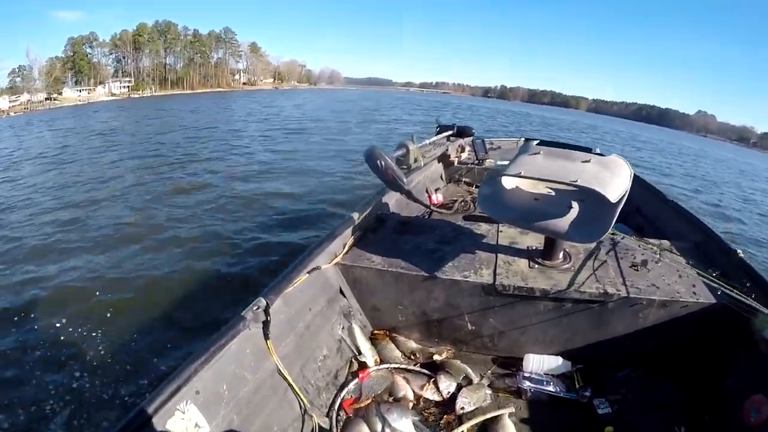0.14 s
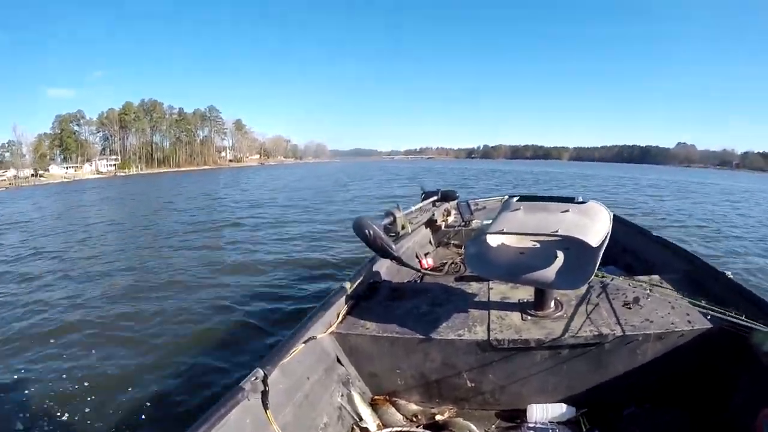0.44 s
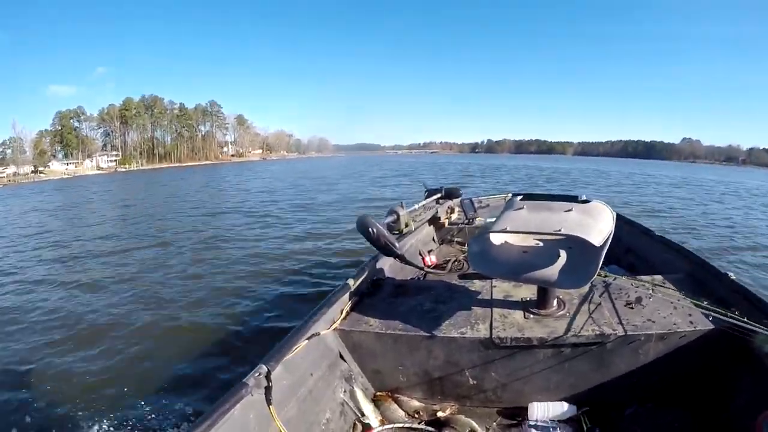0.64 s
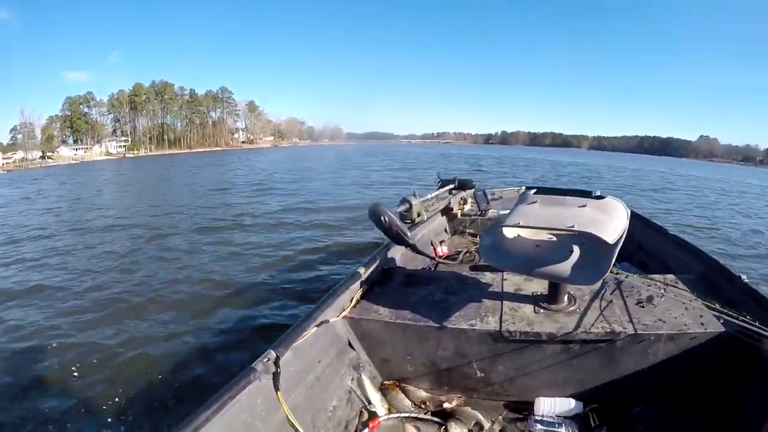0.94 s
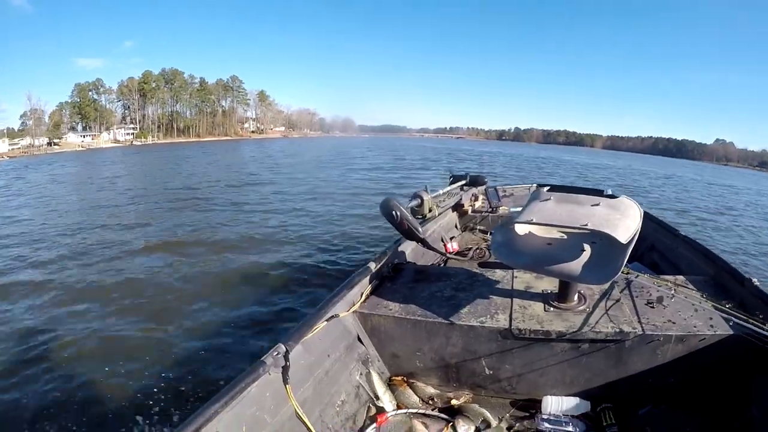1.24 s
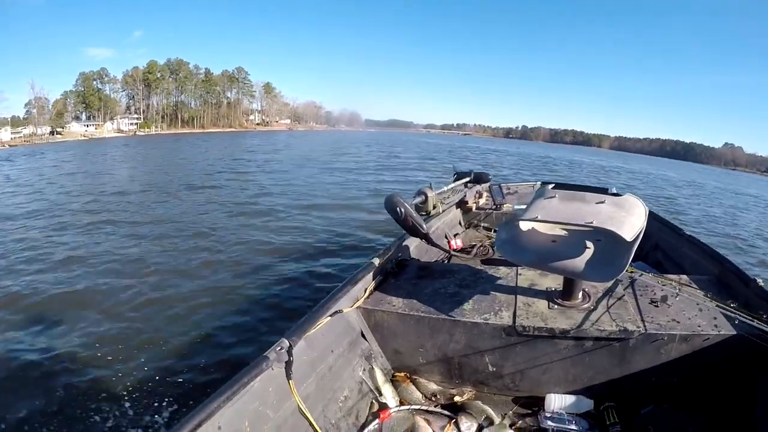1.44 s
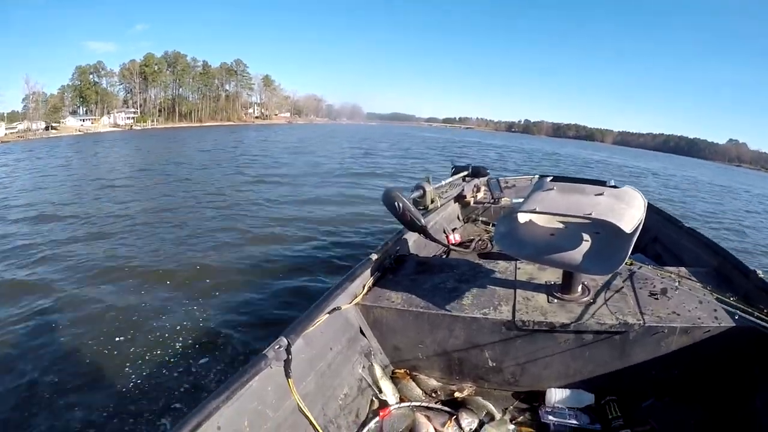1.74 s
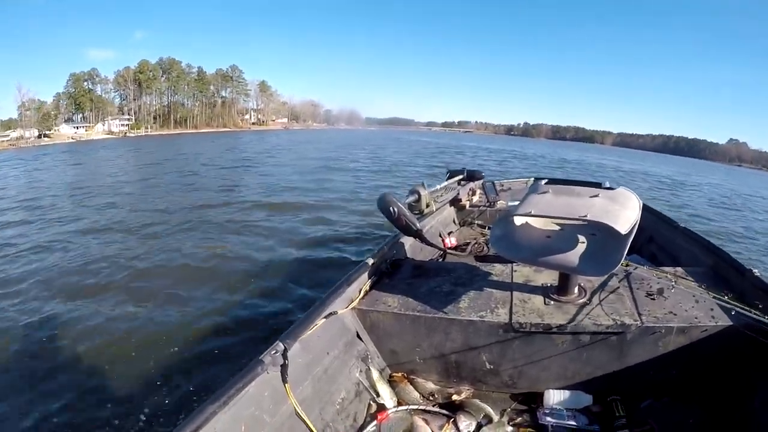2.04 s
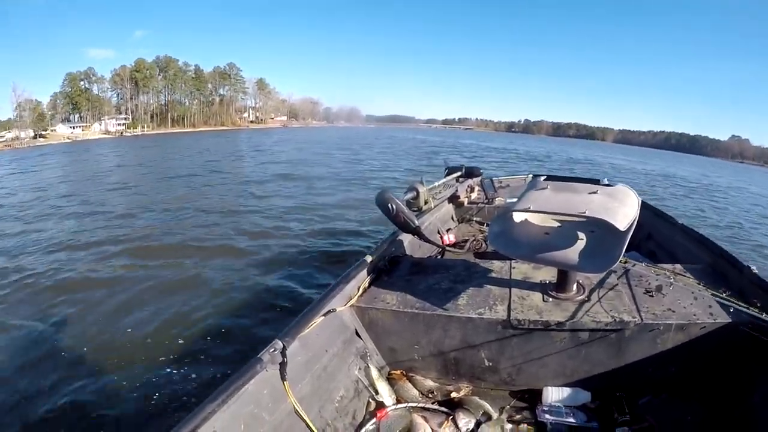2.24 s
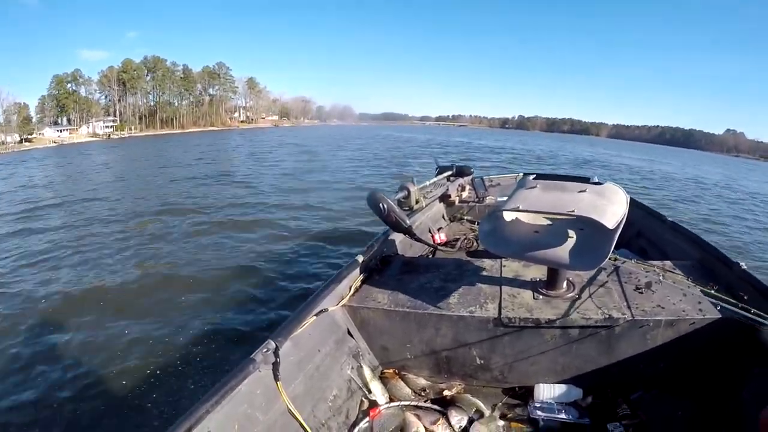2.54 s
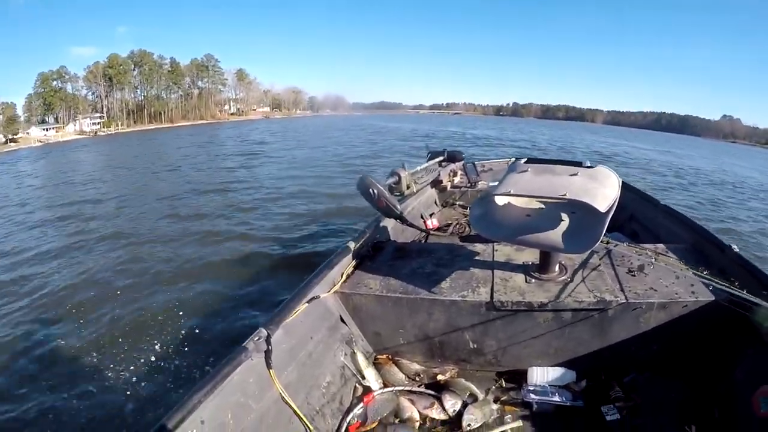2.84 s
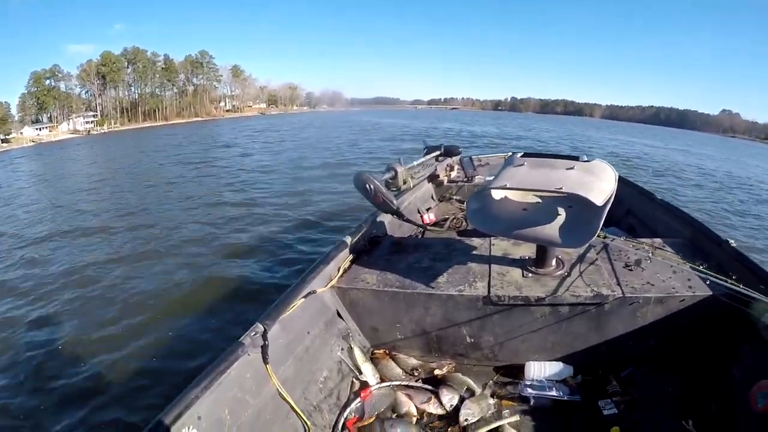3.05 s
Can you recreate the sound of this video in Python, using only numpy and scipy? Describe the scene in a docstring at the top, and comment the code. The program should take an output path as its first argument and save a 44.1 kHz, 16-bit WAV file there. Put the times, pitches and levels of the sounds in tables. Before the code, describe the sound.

A small metal boat's outboard motor hums loudly at speed on open water, slowly gaining revs, while wind rumbles, water rushes past and small slaps knock the hull; close, muffled onboard microphone in a housing.

```python
"""An outboard motor already runs at speed on a small metal boat, muffled as inside a camera housing.
Its shaft orders, harmonics of the rotation, hum through the hull and rise in pitch overall as it gains revs.
Bands of shaped noise give wind rumble, rushing water and thin spray throughout; short chirps give fine droplets.
Three small slaps, gliding tones within noise bursts, come at once; two follow near 1 s.
From about 1.7 s to 2.9 s more slaps come, while the motor keeps running to the end."""
import sys
import numpy as np
from scipy import signal
from scipy.io import wavfile
from scipy.ndimage import uniform_filter1d, minimum_filter1d

SR = 44100
rng = np.random.default_rng(int(sys.argv[2]) if len(sys.argv) > 2 else 0)


def file_out(sig):
    """Save sig as 16-bit WAV at sys.argv[1]."""
    # one column per channel
    cols = np.atleast_2d(sig).T
    # limit, then scale
    lim = np.clip(cols, -1, 1)
    pcm = np.round(lim * 32767).astype(np.int16)
    wavfile.write(sys.argv[1], SR, pcm)


def invert_db(level):
    """Linear amplitude ratio for a level in decibels (20 dB per decade), elementwise."""
    return 10 ** (np.asarray(level, dtype=float) / 20)


N = 141120  # samples

# Course of the motor and its strong shaft orders, rms levels:
# (t/s, shaft speed/(turns/s), 4th order level/dB, 2nd order level/dB, 1st order level/dB)
MOTOR_COURSE = [(0, 76.7, -13.5, -16.5, -39.5), (.3, 78.0, -11, -11.5, -19.5), (.7, 78.6, -11, -13.5, -26),
                (1.1, 79, -10.5, -12, -30.5), (1.6, 80.6, -10, -11.5, -30), (1.8, 80.5, -10, -15.5, -18.5),
                (2.2, 81.1, -10, -14, -29), (2.55, 81.6, -11, -16, -18), (2.9, 82.4, -11.5, -17.5, -22.5),
                (3.2, 82.6, -11, -18, -25)]


def evened(x):
    """Normalization: scales a signal to rms 1."""
    return x / np.sqrt(np.mean(x ** 2) + 1e-20)


def curve(table, column):
    """Linear interpolation: joins a table column by straight lines in time."""
    rows = np.array(table)
    return np.interp(np.arange(N) / SR, rows[:, 0], rows[:, column])


def drift(top_hz):
    """Superposition: sines of random phase, weaker towards top_hz, sum to a wander of rms 1."""
    t = np.arange(0, N + 64, 64) / SR
    wander = 0
    for hz in top_hz * np.geomspace(0.04, 1, 24):
        wander = wander + np.sin(2 * np.pi * (hz * t + rng.random())) / np.sqrt(hz)
    return np.interp(np.arange(N) / SR, t, evened(wander))


def hiss(spectrum, size, patchy_db, flicker_db):
    """Short-time synthesis: shaped random spectra, with drifting patches and a flicker common to all bands."""
    frames = 4 * N // size + 8
    hz = np.fft.rfftfreq(size, 1 / SR)
    real, imag, patches = rng.standard_normal((frames, len(hz), 3)).T
    # The arrays run (frequency, frame): smooth the patches along both.
    patches = evened(uniform_filter1d(uniform_filter1d(patches, 8, 0), 6, 1))
    flicker = evened(uniform_filter1d(rng.standard_normal(frames), 3))
    f, db = np.transpose(spectrum)
    level = np.interp(np.log(hz + 1), np.log(f + 1), db, left=-90, right=-90)[:, None]
    z = (real + 1j * imag) * invert_db(level + patchy_db * patches + flicker_db * flicker)
    noise = signal.istft(z, nperseg=size, noverlap=3 * size // 4)[1]
    return evened(noise[:N])


def shaft_angle():
    """Rotation: the angle/rad is the running sum of a slightly unsteady shaft speed."""
    jitter, jitter_top_hz = 0.0015, 20  # jitter: rms share of the speed
    speed = curve(MOTOR_COURSE, 1) * (1 + jitter * drift(jitter_top_hz))
    return 2 * np.pi * np.cumsum(speed) / SR


def motor(angle):
    """Harmonic synthesis: suction-like pulses from three strong orders in step and many weak, wavering ones.
    Uneven firing moves energy from the 2nd order to the 1st."""
    # Weaker shaft orders: (multiple of shaft speed, rms level/dB before wavering)
    weak_orders = [(3, -33), (5, -37.5), (6, -48), (7, -50), (8, -52), (9, -47), (10, -52.5), (11, -54),
                   (12, -60), (13, -59), (14, -56), (15, -61), (16, -57.5), (18, -53), (19, -69.5),
                   (20, -56.5), (21, -59.5), (22, -55), (23, -58.5), (24, -54.5), (25, -56.5), (27, -62.5),
                   (28, -64), (29, -55), (30, -65), (31, -67.5), (32, -62.5), (33, -63)]
    waver_top_hz = 40
    uneven = drift(waver_top_hz)
    strong_orders = [  # (multiple of shaft speed, table column, waver/dB)
        (4, 2, 0.4 * drift(waver_top_hz)),
        (2, 3, -1.3 * uneven),
        (1, 4, 2.8 * uneven)]
    hum = np.zeros(N)
    for order, column, waver_db in strong_orders:
        hum -= invert_db(curve(MOTOR_COURSE, column) + waver_db) * np.cos(order * angle)
    for order, db in weak_orders:
        phase = 2 * np.pi * rng.random()
        hum += invert_db(db + 3.0 * drift(waver_top_hz)) * np.cos(round(order) * angle + phase)
    return np.sqrt(2) * hum  # turns rms levels into cosine peaks


def wind():
    """Turbulence: low-frequency noise of wind on the housing swells with the gusts."""
    # Noise shape: (f/Hz, relative density level/dB per Hz)
    spectrum = [(12, -43.5), (22, -16), (35, -15.5), (65, -3.5), (125, 0.5), (190, -5), (290, -10),
                (400, -15), (450, -27.5), (600, -50)]
    # Gusts: (t/s, rms level/dB)
    gusts = [(0, -13.5), (.3, -18.5), (.6, -17.5), (1.0, -16.5), (1.6, -18), (1.75, -14.5), (2.3, -17),
             (2.45, -14), (2.75, -15.5), (3.2, -15)]
    return invert_db(curve(gusts, 1)) * hiss(spectrum, size=1024, patchy_db=1.1, flicker_db=0.8)


def slap(t, shift, splash_db, top_hz):
    """Damped oscillation: a short wet knock glides up in pitch inside a band-limited splash."""
    from_hz, to_hz, glide_s = 850, 1736, 0.0031  # pitches before the shift
    rise_s, t60_s, splash_low_hz = 0.0017, 0.02, 786
    hz = shift * (to_hz + (from_hz - to_hz) * np.exp(-t / glide_s))
    knock = np.sin(2 * np.pi * np.cumsum(hz) / SR)
    band = signal.butter(3, [splash_low_hz, top_hz], "bandpass", fs=SR, output="sos")
    splash = evened(signal.sosfilt(band, rng.standard_normal(len(t))))
    rise = 1 - np.exp(-(t / rise_s) ** 2)
    decay = invert_db(-60 * np.maximum(t - glide_s, 0) / t60_s)
    return (knock + invert_db(splash_db) * splash) * rise * decay


def slaps():
    """Impact sound: water slaps the hull, each knock a little different in pitch."""
    # Slaps: (t/s, knock amplitude level/dB, splash rms level re knock amplitude/dB, splash top f/Hz)
    hits = [(0.057, -32, -9, 2210), (0.162, -25.5, -9, 4330), (.2795, -28, -9.5, 2200),
            (.966, -27.5, -6, 2300), (1.111, -27.5, -5.5, 2450), (1.6586, -31.5, -11, 2000),
            (1.744, -27.5, -8, 2000), (2.0007, -28, -9, 2300), (2.517, -34, -9, 2000),
            (2.607, -28.5, -9, 2190), (2.715, -24.5, -11, 2300), (2.8142, -26, -11, 2308),
            (2.9235, -26.5, -7, 2009)]
    t = np.arange(3000) / SR
    out = np.zeros(N + len(t))
    for s, db, splash_db, top_hz in hits:
        shift = 1 + 0.03 * rng.standard_normal()
        start = round(s * SR)
        out[start:start + len(t)] += invert_db(db) * slap(t, shift, splash_db, top_hz)
    return out[:N]


def rush(angle):
    """Amplitude modulation: three noise bands of water along the hull and engine rasp pulse twice a turn."""
    # Layer levels: (t/s, wash rms level/dB, gurgle rms level/dB, fizz rms level/dB)
    levels = [(0, -39, -45.5, -43.5), (.1, -37, -44, -47), (.3, -37, -43.5, -49), (.55, -37, -43.5, -50),
              (.75, -38.5, -46, -48.5), (1.0, -40, -44.5, -48.5), (1.3, -40, -43, -49),
              (1.6, -41.5, -45, -49.5), (1.9, -42.5, -44, -50), (2.2, -39.5, -42.5, -50),
              (2.6, -41, -41, -49), (2.9, -40.5, -42, -50), (3.2, -39, -41, -50.5)]
    # Noise shapes, low to high layer: each (f/Hz, relative density level/dB per Hz)
    wash_spectrum = [(300, -17), (480, -5.5), (630, 1), (720, -0.5), (870, -5.5), (1020, -11), (1300, -30)]
    gurgle_spectrum = [(700, -20.5), (1050, -1.5), (1440, 0.5), (2050, -1), (2500, -5.5), (2900, -16),
                       (3400, -30)]
    fizz_spectrum = [(2200, -25.5), (2900, -0.5), (4000, -0.5), (6200, -3.5), (7000, -16.5), (9000, -25.5),
                     (10500, -41)]
    rasp_depth = 0.062  # modulation depth
    wash = invert_db(curve(levels, 1)) * hiss(wash_spectrum, size=512, patchy_db=0.9, flicker_db=-1.2)
    gurgle = invert_db(curve(levels, 2)) * hiss(gurgle_spectrum, size=512, patchy_db=1.0, flicker_db=1.7)
    fizz = invert_db(curve(levels, 3)) * hiss(fizz_spectrum, size=512, patchy_db=1.1, flicker_db=0.7)
    return (wash + gurgle + fizz) * (1 + rasp_depth * np.cos(2 * angle))


def drops():
    """Bubble resonance: random droplets and bubbles ring as brief rising chirps, weaker when higher."""
    drops_per_s, level_db, spread_db = 260, -52.5, 2.5  # level_db: rms of all drops
    low_hz, high_hz, kinds, cycles = 1015, 5000, 20, 2.2
    starts = rng.random(N) < drops_per_s / SR
    size = invert_db(spread_db * np.minimum(rng.exponential(1, N), 4)) * starts
    kind = rng.integers(0, kinds, N)
    t = np.arange(1500) / SR
    out = np.zeros(N)
    for k, hz in enumerate(np.geomspace(low_hz, high_hz, kinds)):
        u = hz * t / cycles  # time in units of the given number of cycles
        chirp = np.sin(2 * np.pi * hz * t * (1 + 0.13 * u))
        grain = u * np.exp(-3 * u) * chirp * low_hz / hz
        out += signal.oaconvolve(size * (kind == k), grain)[:N]
    return invert_db(level_db) * evened(out)


def spray():
    """Band-limited noise: the thin top hiss of spray swells and fades."""
    # Noise shape: (f/Hz, relative density level/dB per Hz)
    spectrum = [(6500, -30), (7500, -5), (9500, -9), (10800, -20), (11800, -5), (12600, 0), (14000, -4),
                (15300, -12), (16000, -40)]
    # Course: (t/s, rms level/dB)
    levels = [(0.05, -63), (0.21, -67), (0.6, -67), (0.68, -62), (0.77, -66), (0.8, -59), (0.91, -67),
              (1.01, -63), (1.24, -67), (1.33, -61), (1.47, -68), (1.53, -65), (1.73, -72), (2.24, -67),
              (2.48, -68), (2.61, -63), (2.93, -67), (2.96, -62), (3.04, -68), (3.15, -65)]
    return invert_db(curve(levels, 1)) * hiss(spectrum, size=512, patchy_db=1.8, flicker_db=1.5)


def scene():
    """Superposition: the motor and all wind and water sounds add in one channel."""
    angle = shaft_angle()
    mix = motor(angle) + wind() + slaps() + rush(angle) + drops() + spray()
    return mix[None]


def low_pass(x):
    """Removes everything above the highest recorded frequency."""
    return signal.sosfilt(signal.butter(12, 15300, fs=SR, output="sos"), x)


def record(dry):
    """Peak limiting: a smoothed gain turns down around the highest peaks."""
    ceiling_db, hold_s = -1.1, 0.012
    span = round(hold_s * SR)
    needed = np.minimum(invert_db(ceiling_db) / (abs(dry) + 1e-9), 1)
    gain = minimum_filter1d(needed, span, axis=1)
    for _ in range(2):
        gain = uniform_filter1d(gain, span // 2, axis=1)
    return low_pass(dry * gain)


dry = scene()
out = record(dry)
file_out(out)
```